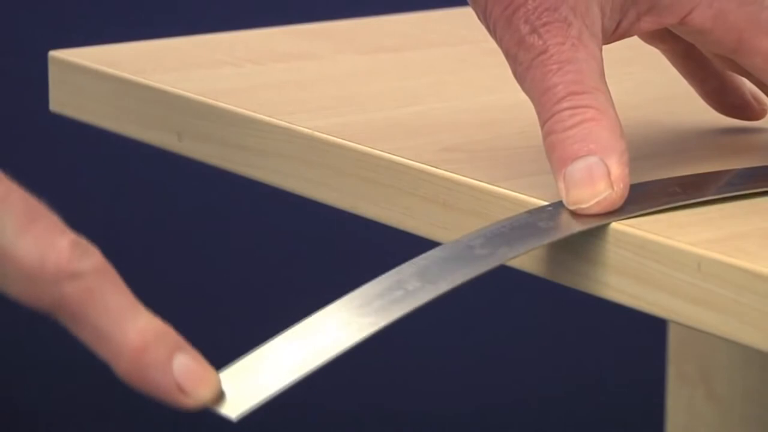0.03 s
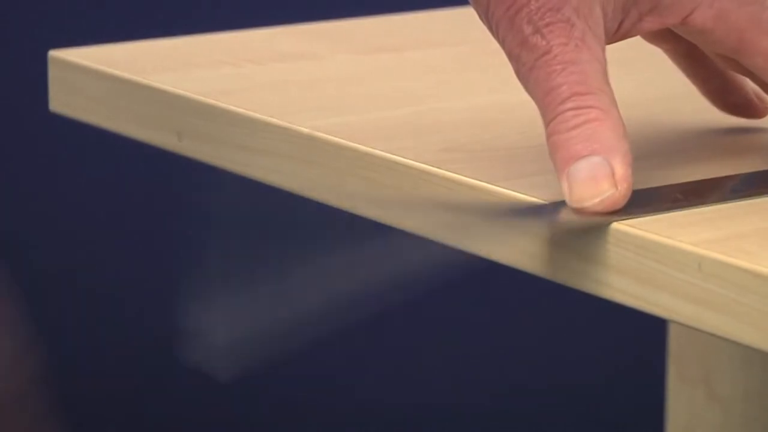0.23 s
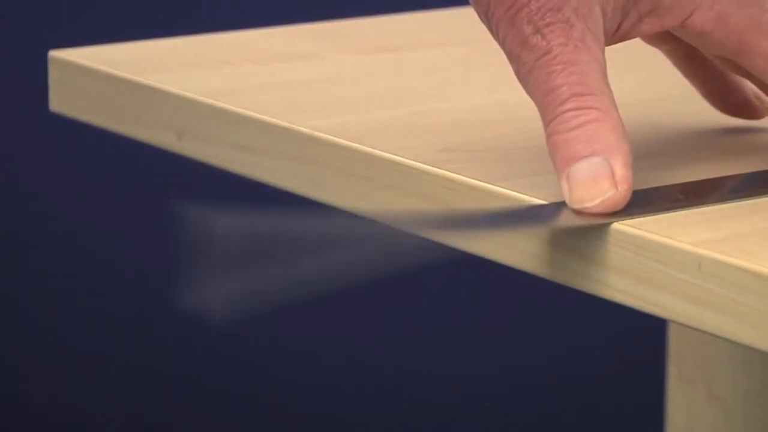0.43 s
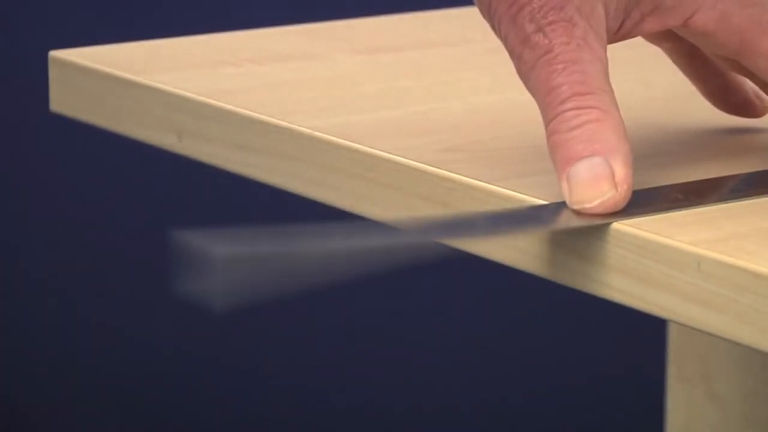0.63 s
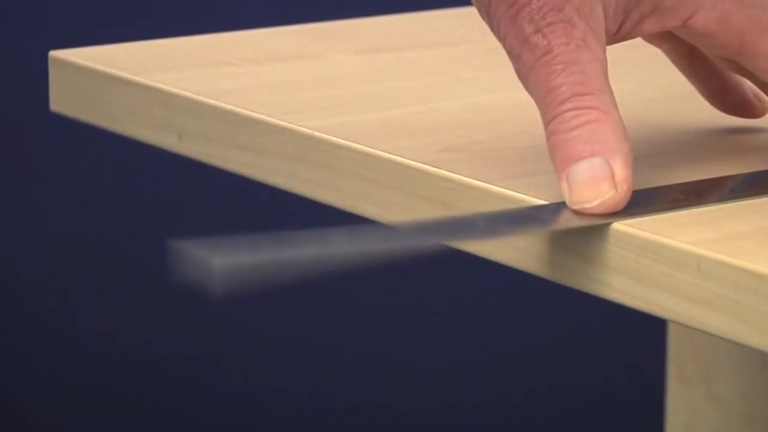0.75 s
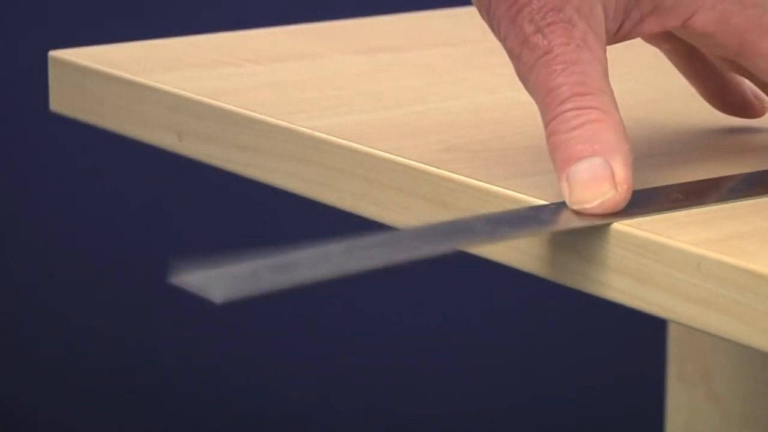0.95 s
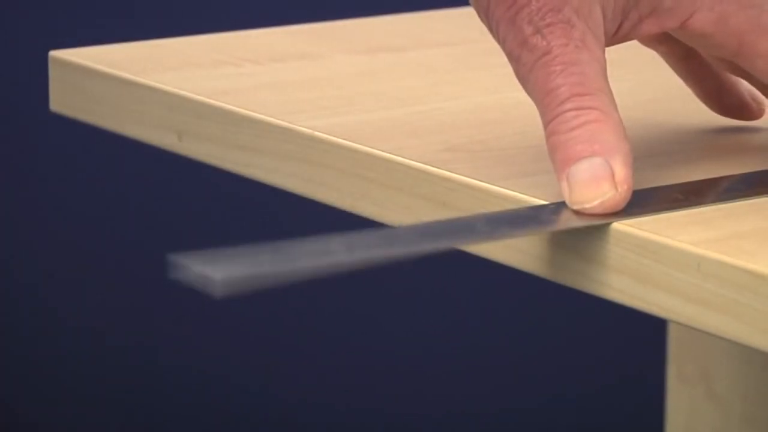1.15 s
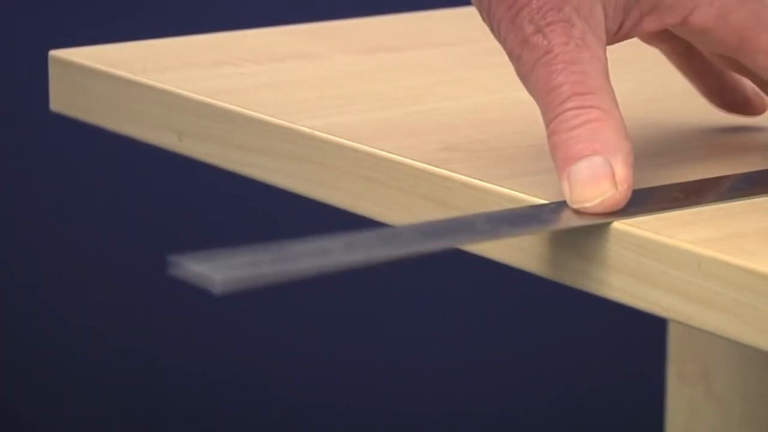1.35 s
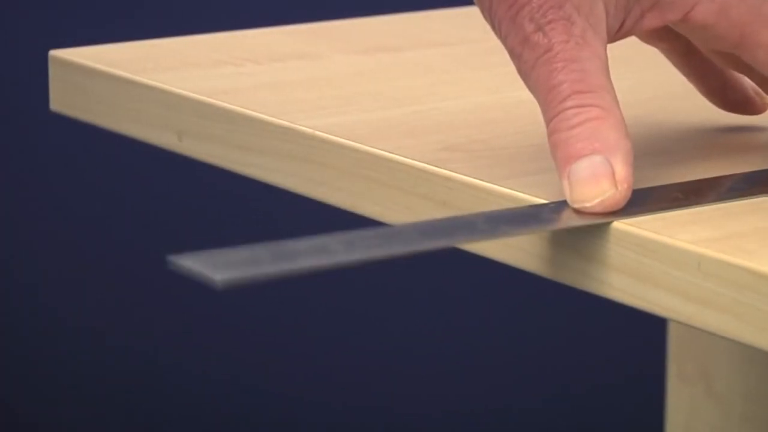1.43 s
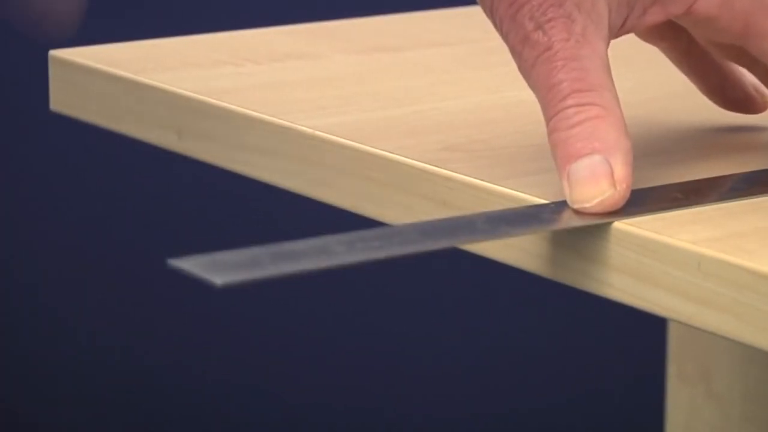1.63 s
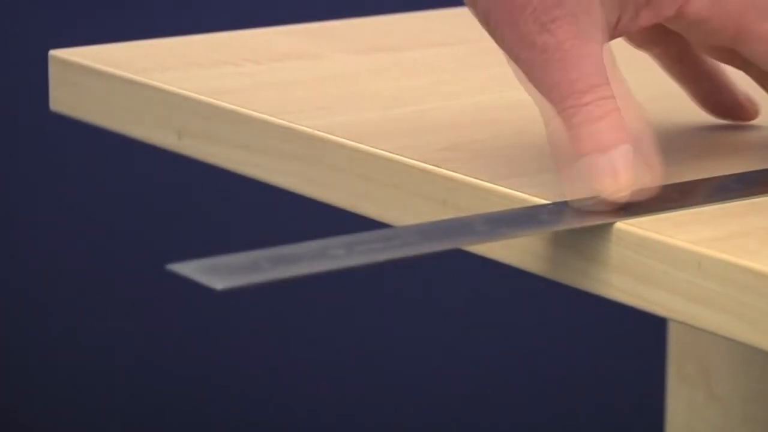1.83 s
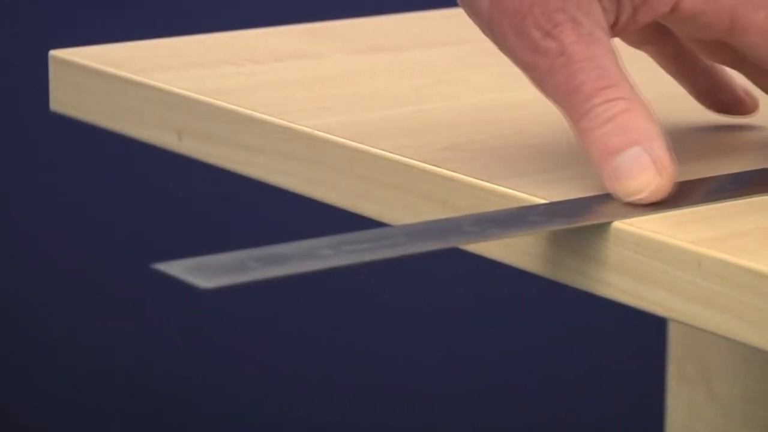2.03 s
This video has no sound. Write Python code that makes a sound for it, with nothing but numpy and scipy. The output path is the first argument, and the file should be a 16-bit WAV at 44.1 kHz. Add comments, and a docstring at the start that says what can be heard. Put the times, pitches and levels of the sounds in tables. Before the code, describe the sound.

A steel ruler twangs against a wooden table edge, close up in a quiet room. At about 0.2 seconds it is released with a sharp, slightly distorted crack. A buzzing rattle of rapid metal-on-wood slaps follows, quickening a little as it fades. From about 0.8 seconds a soft low hum with light ticks remains, dying away by 1.6 seconds. Near 1.9 seconds the ruler slides with a faint rub.

```python
"""A sharp crack, then a buzzing rattle: a steel ruler, thumbed to a table edge, is bent down and let go.
On every swing it slaps the table, lifts and lands again, ringing its bending modes and the board;
the swings quicken as they shrink, leaving a soft hum. At the end the thumb shifts and drags the ruler.
One microphone, close to the table in a quiet room; the first slaps overload it."""
import sys
import numpy as np
from scipy import signal
from scipy.fft import rfft, irfft
from scipy.io import wavfile

SR = 44100
rng = np.random.default_rng(int(sys.argv[2]) if len(sys.argv) > 2 else 0)


def pcm_store(signal):
    """Save signal as 16-bit PCM."""
    levels = np.round(np.clip(np.atleast_2d(signal), -1, 1) * 32767)
    wavfile.write(sys.argv[1], SR, levels.astype(np.int16).T)


N = 92610
TIME = np.arange(N) / SR
RELEASE_S, CONTACT_END_S = .2273, 1.6


def amp(db):
    """Decibels to gain."""
    return 10 ** (np.asarray(db) / 20)


def curve(rows, t, column=1):
    """One column of a table, interpolated at time t."""
    rows = np.array(rows)
    return np.interp(t, rows[:, 0], rows[:, column])


def colour(x, points):
    """Filters x by a spectrum of frequency_hz, gain_db points."""
    f, db = np.transpose(points)
    hz = np.fft.rfftfreq(len(x), 1 / SR)
    gain = amp(np.interp(np.log(hz + 1), np.log(f + 1), db))
    return irfft(rfft(x) * gain, len(x))


def noise(points, size):
    """Coloured noise of rms 1."""
    x = colour(rng.standard_normal(size), points)
    return x / x.std()


def add(mix, start_s, sound):
    """Mixes a sound in at start_s."""
    part = mix[max(round(start_s * SR), 0):][:len(sound)]
    part += sound[:len(part)]


def ring(modes):
    """Response of a set of modes to one blow."""
    t = TIME[:SR // 4]
    return sum(amp(db - 60 * t / t60) * np.sin(2 * np.pi * hz * t) for hz, db, t60 in modes)


# Room tone, all around the microphone: frequency_hz, density_db
ROOM_TONE = [(15, -24), (25, 0), (110, -6), (200, -3), (330, -6), (600, -13), (1100, -18.5), (2000, -21),
             (4500, -29), (9700, -36), (11500, -41), (15600, -58)]

def room_tone(whine_hz=3185):
    """The quiet room: a low rush and a thin, steady whine."""
    return amp(-49.5) * noise(ROOM_TONE, N) + amp(-61.5) * np.sin(2 * np.pi * whine_hz * TIME)


def reverb(x, level_db=-15.5, t60_s=.66):
    """The walls return a short, faint tail with little bass."""
    t = TIME[:SR // 2]
    tail = rng.standard_normal(len(t)) * amp(-60 * t / t60_s) * (t > .004)
    tail = signal.sosfilt(signal.butter(2, 350, "high", fs=SR, output="sos"), tail)
    return amp(level_db) * signal.fftconvolve(x, tail / np.linalg.norm(tail))[:N]


# Finger and thumb on the ruler, close up: time_s, level_db
RUB_LEVELS = [(0, -63.5), (.19, -61.5), (.222, -41), (.235, -78), (1.857, -89), (1.861, -48),
              (1.895, -48.5), (1.925, -60.5), (2.0, -74), (2.018, -53), (2.03, -64), (2.06, -52.5),
              (2.1, -46.5)]
# Colour of that friction: frequency_hz, density_db
RUB_SPECTRUM = [(180, -39), (300, -7), (370, -3), (518, -39), (840, -1.5), (1250, -17), (1400, -10),
                (1520, -20.5), (2550, -13), (3140, -6.5), (3570, -20), (4540, -9.5), (5600, -22.5),
                (9370, -21.5), (14000, -53)]
# High modes of the steel, also struck in the rattle: pitch_hz, level_db, t60_s
STEEL_MODES = [(1014, -10, 0.07), (1680, -6, 0.048), (2624, -10, .025), (2767, -10.5, 0.016),
               (3352, -4, 0.015), (4588, 2.5, 0.018), (5790, -7.5, 0.015), (6100, -10.5, 0.011),
               (7360, -9.5, 0.0088), (8390, -14, 0.0075), (9130, -13, 0.0093)]

def thumb_rub():
    """Skin and steel slide with a fine grain that stirs the high modes."""
    grain_times = TIME[::128]
    grain_db = 2.9 * np.interp(TIME, grain_times, rng.standard_normal(len(grain_times)))
    force = amp(curve(RUB_LEVELS, TIME) + grain_db)
    steel = ring(STEEL_MODES)
    sing = signal.fftconvolve(force * rng.standard_normal(N), steel / np.linalg.norm(steel))[:N]
    return force * noise(RUB_SPECTRUM, N) + amp(-10) * sing


# The table top, at the release and as the thumb eases: start_s, pitch_hz, level_db, length_s
THUMPS = [(.232, 59, -11.5, 0.065), (1.854, 54.4, -41.5, 0.064)]

def table_thumps():
    """A few slow cycles of the table top, swelling and dying."""
    out = np.zeros(N)
    for start, hz, db, length in THUMPS:
        t = np.arange(0, length, 1 / SR)
        add(out, start, -amp(db) * np.sin(np.pi * t / length) * np.sin(2 * np.pi * hz * t))
    return out


# One swing of the end overhanging the table: time_s, period_s
SWING_PERIODS = [(.2273, .0528), (.2796, .0424), (.37, .0419), (.46, .041), (.57, .0405), (.806, .0376),
                 (.955, .0362), (1.0, .033), (1.2, .0325), (1.28, .0332), (1.37, .0348), (1.45, .04)]

def swings():
    """Start times of the swings, each a period after the last."""
    times = [RELEASE_S]
    while times[-1] < TIME[-1]:
        times.append(times[-1] + curve(SWING_PERIODS, times[-1]))
    return np.array(times)


SLAP_AT, LIFT_AT, LAND_AT, GRAZE_AT = 0, .45, .6, .88  # shares of a swing

def contact_times(share):
    """The moment at this share of every swing that still touches the table."""
    starts = swings()
    times = starts[:-1] + share * np.diff(starts)
    return times[starts[:-1] < CONTACT_END_S]


# Air and table pushed by the swing, at close range: time_s, fundamental_db, overtones_db
FLUTTER = [(.227, -36, -35), (.26, -28, -23), (.3, -26, -16.5), (.42, -39, -20), (.6, -26, -21),
           (.68, -37, -34.5), (.76, -40, -42), (1.1, -36, -47.5), (1.35, -42.5, -50), (1.65, -49.5, -45.5),
           (1.95, -64, -56.5)]
# Overtone about an octave above the twang: time_s, level_db
OCTAVE = [(.227, -60), (.24, -31), (.4, -24), (.53, -32.5), (.7, -36.5), (.82, -51.5), (.95, -65),
          (1.1, -75)]

def swing_flutter(lag_s=.004):
    """Harmonics of the swing: the lowest three flutter, the fourteenth brightens the twang."""
    starts = swings()
    phase = 2 * np.pi * np.interp(TIME - lag_s, starts, np.arange(len(starts)))
    wobble = .5 * np.interp(TIME, starts, rng.standard_normal(len(starts)))
    fundamental = amp(curve(FLUTTER, TIME)) * np.sin(phase)
    overtones = amp(curve(FLUTTER, TIME, column=2)) * (np.sin(2 * phase) + amp(-8) * np.sin(3 * phase))
    octave = amp(curve(OCTAVE, TIME)) * np.sin(14 * phase + wobble)
    return octave - fundamental + overtones


# Hollow note of the ruler at the table edge: time_s, level_db
HOLLOW_LEVELS = [(.227, -4), (.3, -9.5), (.4, -11.5), (.47, -20), (.58, -18.5), (.7, -26.5), (.77, -28),
                 (.81, -39), (.89, -35.5), (1.0, -40.5), (1.2, -50.5), (1.5, -45.5), (1.6, -49)]

def hollow_note(t60_s=.093, rise_s=.0023, spread_hz=13.4):
    """The third bending mode, kicked by slap and landing, a little different in pitch and level each time."""
    out, t = np.zeros(N), TIME[:SR // 8]
    envelope = np.minimum(t / rise_s, 1) * amp(-60 * t / t60_s)
    for share, db, hz in (SLAP_AT, 0, 541.3), (LAND_AT, -2.5, 562):
        for start in contact_times(share):
            detune, uneven = rng.standard_normal(2)
            gain = amp(db + curve(HOLLOW_LEVELS, start) + 1.6 * uneven)
            add(out, start, gain * envelope * np.sin(2 * np.pi * (hz + spread_hz * detune) * t))
    return out


# Soft hum of the overhanging end: time_s, pitch_hz, level_db
HUM = [(.69, 181.6, -49), (.718, 177, -25), (.76, 184, -13), (.8, 186, -14.5), (.89, 188.2, -17.5),
       (.96, 186.8, -25.5), (1.01, 189, -34.5), (1.08, 171.8, -40.5), (1.25, 171.8, -46.5),
       (1.37, 175.6, -40), (1.55, 180, -53), (1.8, 184.4, -44.5), (1.9, 182, -60)]

def hum():
    """The second bending mode rings on unbroken once the swings are small."""
    phase = 2 * np.pi * np.cumsum(curve(HUM, TIME)) / SR
    return amp(curve(HUM, TIME, column=2)) * np.sin(phase) * (TIME > HUM[0][0])


# Twang of the ruler as it lands on the table: time_s, level_db
TWANG_LEVELS = [(.26, -12), (.3, -9), (.39, -11), (.44, -7.5), (.56, -10.5), (.6, -12), (.64, -13.5),
                (.68, -19), (.72, -16), (.8, -63)]

def twang(pitch_hz=176, bend_s=.013, fade_s=.0098, t60_s=.18):
    """The second bending mode, kicked by the release, then restarted slightly sharp by each landing."""
    out, t = np.zeros(N), TIME[:SR // 8]

    def gate(length_s):
        return np.clip(t / fade_s, 0, 1) * np.clip((length_s - t) / fade_s + 1, 0, 1)

    first_note = ring([(177, -2.5, .43)])[:len(t)]
    add(out, RELEASE_S, gate(length_s=.071) * first_note)
    cycles = np.cumsum(pitch_hz * (1 + .25 * np.exp(-t / bend_s))) / SR
    note = amp(-60 * (t - fade_s) / t60_s) * np.sin(2 * np.pi * cycles)
    landings = contact_times(LAND_AT)[1:]
    for start, length in zip(landings, np.diff(landings)):
        add(out, start, amp(curve(TWANG_LEVELS, start)) * gate(length) * note)
    return out


# Bright scrape of steel on the table edge: frequency_hz, density_db
SCRAPE = [(20, -43), (700, -11), (2500, 6.5), (4500, 2), (7000, 3), (10000, -22.5), (16000, 3.5)]

def contacts(share, levels, knock_db, steel_db, chatter_s, uneven_db=1.5, scrape_t60_s=.018):
    """Once a swing steel chatters on wood: returns blows for the low and high modes, and grit."""
    t = TIME[:1024]
    low, high, grit = np.zeros((3, N))
    scrape_envelope = amp(-9 - 60 * t / scrape_t60_s) * np.minimum(t / chatter_s / 2, 1)
    for start in contact_times(share):
        knock = amp(curve(levels, start) + uneven_db * rng.standard_normal())
        steel = amp(curve(levels, start, column=2) + uneven_db * rng.standard_normal())
        chatter = rng.standard_normal(len(t)) * t * np.exp(-t / chatter_s)
        blow = .78 * chatter / np.linalg.norm(chatter)
        blow[round(chatter_s * SR)] += 1  # one clean hit at the height of the chatter
        add(low, start, np.array([knock]))
        add(high, start, steel * blow)
        add(grit, start, steel * noise(SCRAPE, len(t)) * scrape_envelope)
    return np.array([amp(knock_db) * low, amp(steel_db) * high, grit])


# Contacts at the table edge, close up; the graze comes just before a slap: time_s, knock_db, steel_db
SLAPS = [(.227, 2, -4.5), (.28, 5, -20), (0.329, -4.5, -13), (.41, -8.5, -15), (.46, -17, -21.5),
         (.6, -21.5, -22.5), (.81, -28.5, -22), (.9, -32, -23.5), (0.999, -36.5, -36.5), (1.2, -56, -52.5),
         (1.599, -41, -65)]
LIFTS = [(.25, -10.5, -30), (.39, -7.5, -17), (.48, -11.5, -36), (.6, -22, -30), (.75, -26.5, -49),
         (1.0, -64, -63)]
LANDINGS = [(.26, -6, -24.5), (.39, -17, -17.5), (.52, -18.5, -19.5), (.62, -19.5, -24.5),
            (.72, -28.5, -43), (.8, -33, -52), (1.232, -58, -71), (1.27, -60, -34.5), (1.331, -36.5, -30.5),
            (1.405, -57, -39), (1.451, -37.5, -42.5), (1.529, -44, -40), (1.6, -70, -57)]
GRAZES = [(.5, -47, -43), (.68, -45, -30), (.8, -31, -32), (.88, -28, -34), (.98, -58, -41),
          (1.099, -35.5, -46), (1.3, -80, -72)]
# Low modes of ruler and board together: pitch_hz, level_db, t60_s
KNOCK_MODES = [(340, -4.5, 0.11), (427, -13, 0.068), (658.3, -3, 0.069), (710, -2, 0.047), (785, -3, .09),
               (901.4, -6.5, 0.074), (1013, -6, 0.1), (1151, -18, 0.14), (1419, -10.5, 0.083),
               (1723, -11.5, 0.047), (1910, -27, 0.093)]
# Modes of the whole blade while it is off the wood: pitch_hz, level_db, t60_s
FREE_MODES = [(577, 1.5, .08), (1033, 3.5, 0.035), (1277, -9, 0.081), (1683, -1.5, 0.045),
              (1997, -9, 0.099), (2380, -11, 0.031), (3140, -16, 0.033)]
# Dull wooden clatter of the board: frequency_hz, density_db
CLATTER = [(20, 2.5), (110, -21), (200, -3), (450, -6.5), (750, 6), (1100, -4), (1300, -12), (1600, -11),
           (2100, -21.5), (2700, -5.5), (4000, -33), (9000, -32.5), (16000, -55)]

def rattle(board_t60_s=.034):
    """Slaps and landings ring the ruler against the board; between them the lifted blade rings freely."""
    slap = contacts(SLAP_AT, SLAPS, knock_db=-10.5, steel_db=-9, chatter_s=.001201)
    graze = contacts(GRAZE_AT, GRAZES, knock_db=-20, steel_db=-9.5, chatter_s=.001)
    lift = contacts(LIFT_AT, LIFTS, knock_db=-14, steel_db=-21, chatter_s=.00096)
    land = contacts(LAND_AT, LANDINGS, knock_db=-14, steel_db=-8, chatter_s=.0008)
    low, high, grit = slap + graze + land
    lift_low, lift_high, lift_grit = lift
    t = TIME[:SR // 4]
    board = noise(CLATTER, len(t)) * amp(4 - 60 * t / board_t60_s)
    knocks = signal.fftconvolve(low, ring(KNOCK_MODES) + board)
    free_blade = signal.fftconvolve(lift_low, ring(FREE_MODES) + amp(-6) * board)
    steel = signal.fftconvolve(high + lift_high, ring(STEEL_MODES))
    return (knocks + free_blade + steel)[:N] + grit + lift_grit


# First crack on the table, right by the microphone: frequency_hz, density_db
CRACK = [(100, -16), (900, -4.5), (1150, -10), (1350, 5), (1500, -3), (1680, 4), (2050, -14.5), (2600, 2.5),
         (3300, -20.5), (6000, -13), (16000, -51.5)]

def crack(t60_s=.053):
    """The first, hardest blow, with the whole bend behind it."""
    out, t = np.zeros(N), TIME[:4096]
    add(out, RELEASE_S, noise(CRACK, len(t)) * amp(-4 - 60 * t / t60_s))
    return out


def scene():
    """The ruler up close, the quiet room behind it, in mono."""
    ruler = crack() + rattle() + twang() + hum() + hollow_note() + swing_flutter()
    ruler += table_thumps() + thumb_rub()
    return (ruler + reverb(ruler) + room_tone())[None]


# Response of the microphone and recorder: frequency_hz, gain_db
MIC_RESPONSE = [(20, 0.5), (10000, 0), (11000, -4.5), (12000, -19.5), (15000, -18), (16000, -36)]

def record(dry, clip_level=.86, band_limit_hz=15750):
    """The first slaps overload the recorder; then its treble roll-off and band limit."""
    clipped = np.clip(dry[0], -clip_level, clip_level)
    lowpass = signal.firwin(511, band_limit_hz, window=("kaiser", 9), fs=SR)
    return signal.fftconvolve(colour(clipped, MIC_RESPONSE), lowpass, "same")[None]


dry = scene()
out = record(dry)
pcm_store(out)
```